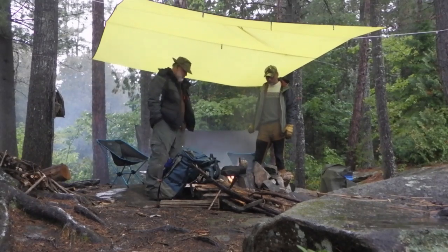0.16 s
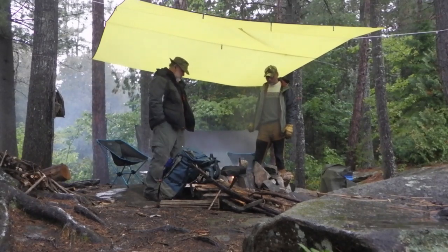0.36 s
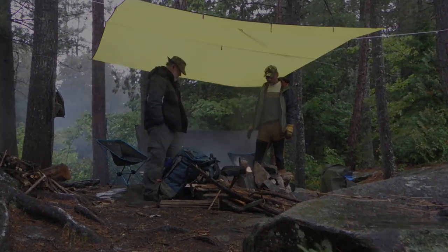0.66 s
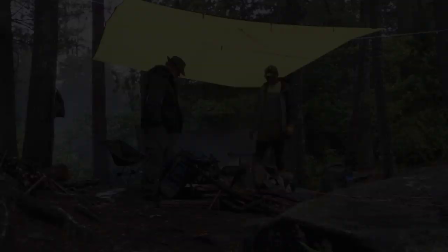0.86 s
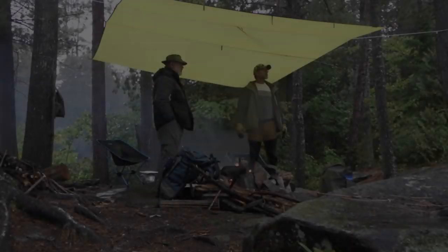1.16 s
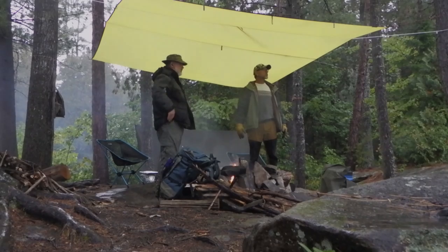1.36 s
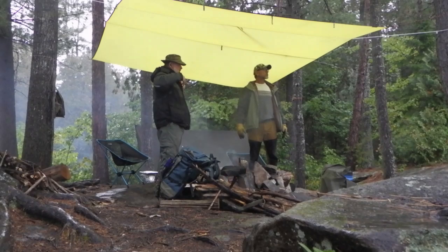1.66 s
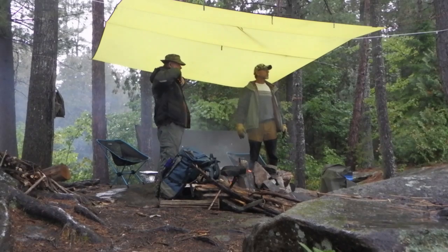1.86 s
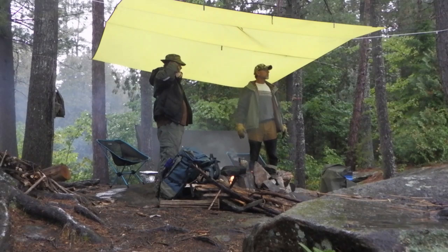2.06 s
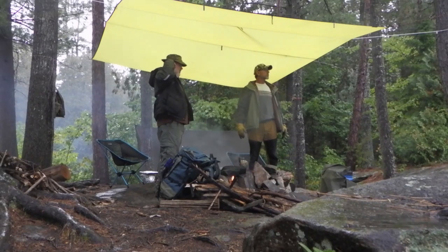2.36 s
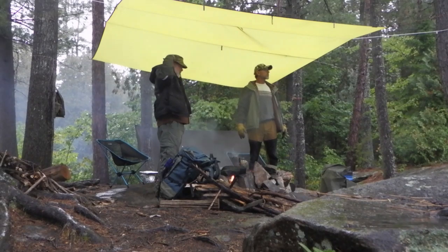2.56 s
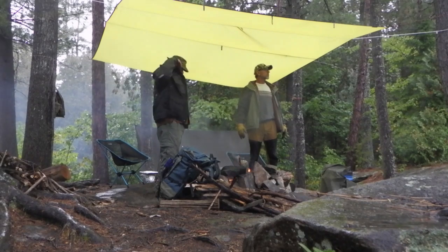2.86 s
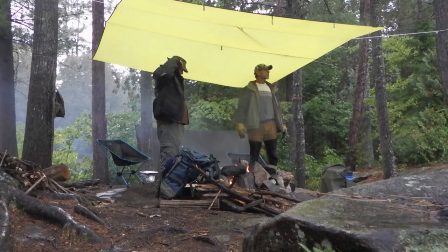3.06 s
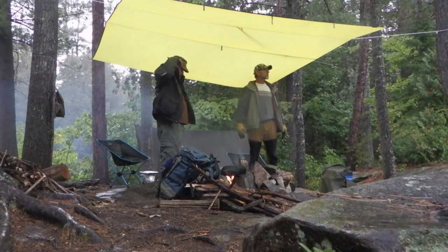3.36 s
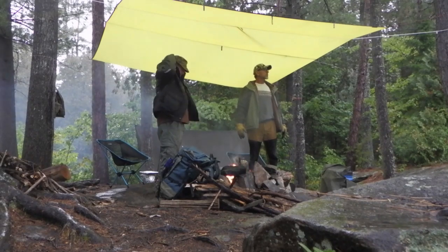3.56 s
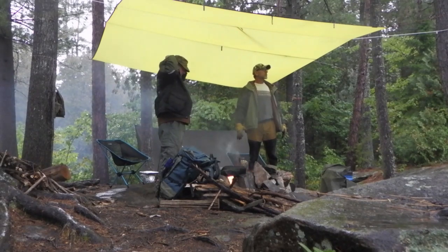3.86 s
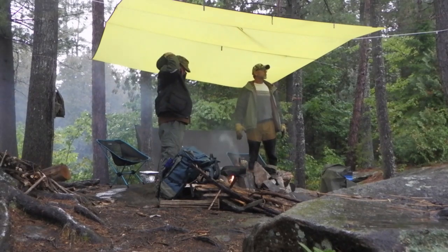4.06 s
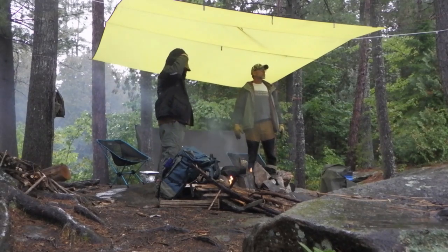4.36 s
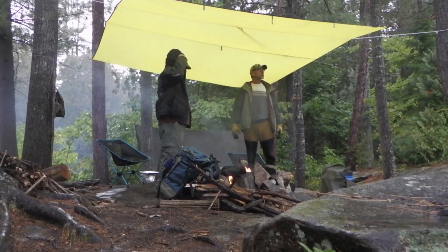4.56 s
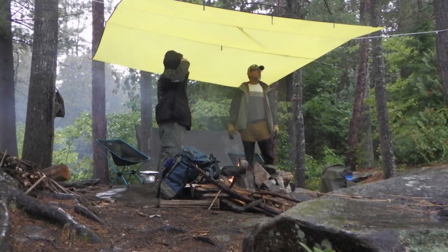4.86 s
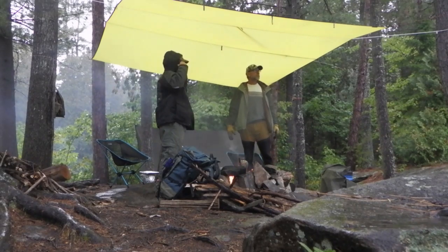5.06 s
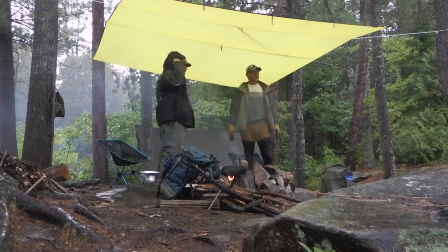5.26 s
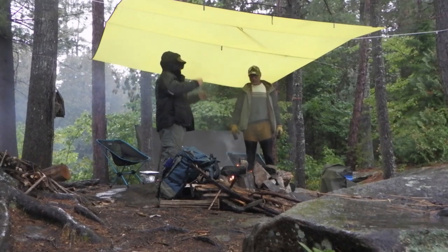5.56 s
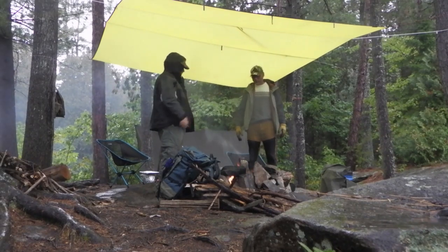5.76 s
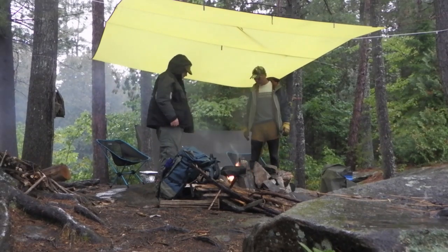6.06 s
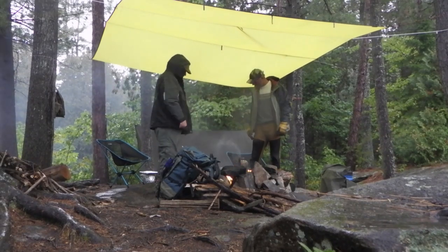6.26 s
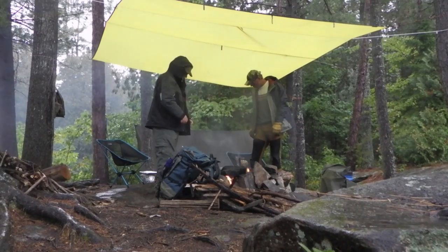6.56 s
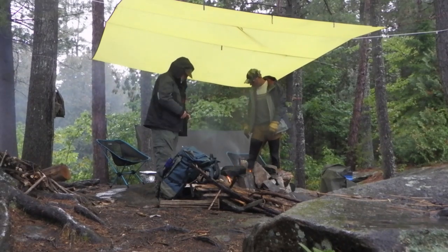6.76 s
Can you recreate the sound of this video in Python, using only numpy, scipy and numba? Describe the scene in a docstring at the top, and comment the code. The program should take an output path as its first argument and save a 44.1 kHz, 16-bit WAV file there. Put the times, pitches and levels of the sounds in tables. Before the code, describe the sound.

Outdoor rain under trees: a continuous wide hiss, countless small splats on tarp and foliage, and heavier drips nearby. A slightly ringing, bright small microphone catches sharp drops left and right, a few hard enough to distort and push the background down for a moment. The opening has dull air thumps, then fades to near silence at one second; rain swells back and drops cluster thickly around five seconds.

```python
"""A forest in steady rain, falling on a tarp and leaves, heard by a small stereo microphone whose housing
rings near 4.4 kHz. Far drops melt into a hiss of shaped noise; nearer ones are ticks and short noise bursts.
A low breeze flutters and soft thuds push mostly one port. The hardest drops clip, and a limiter then ducks
everything and lets it climb back. The sound fades out and in again across an edit at one second."""
import sys
import numpy as np
from scipy import signal
from scipy.fft import rfft, irfft
from scipy.io import wavfile
from scipy.ndimage import uniform_filter1d
from numba import njit

SR = 44100
rng = np.random.default_rng(int(sys.argv[2]) if len(sys.argv) > 2 else 0)


def rack_gain(trim_db):
    """Turn a fader trim in dB into the linear factor to multiply a signal by."""
    fader = np.asarray(trim_db, float)
    return 10 ** (fader / 20)


def wav_out(sig):
    """Save sig, one row per channel (or a flat mono array), as 16-bit PCM at SR to the path in sys.argv[1]."""
    wavfile.write(sys.argv[1], SR, np.round(np.clip(np.atleast_2d(sig).T, -1, 1) * 32767).astype(np.int16))


N = 304510
SIZE = 1024  # samples in one drop or thud
CUT_S = 1.01  # time of the edit


def curve(table, at, log=False):
    """Straight lines between table rows, on a linear or logarithmic axis."""
    x, y = np.transpose(table)
    if log:
        return np.interp(np.log(at + 1), np.log(x), y)
    return np.interp(at, x, y)


def causal(db):
    """Minimum-phase response with the given dB per bin, made by folding the cepstrum forward in time."""
    cepstrum = irfft(np.log(rack_gain(db)), axis=-1)
    half = cepstrum.shape[-1] // 2
    cepstrum[..., 1:half] *= 2
    cepstrum[..., half + 1:] = 0
    return np.exp(rfft(cepstrum, axis=-1))


def colour_db(hz, shift=1):
    """Spectrum of rain as the microphone hears it; the angle of arrival shifts the housing resonances."""
    # broad colour of rain through the microphone: freq_hz, level_db (per Hz)
    rain_colour = [(29, -65), (50, -40), (280, -12.5), (700, -8.5), (1400, -7.5), (2200, -9), (3200, -9),
                   (5200, -11.5), (8750, -20), (10900, -29), (13300, -31), (14500, -36.5), (16000, -101)]
    # resonances of the microphone housing: freq_hz, width_hz, boost_db
    housing = [(4410, 415, 9), (6140, 2120, 7), (3957, 690, 5)]
    total_db = curve(rain_colour, hz, log=True)
    for freq_hz, width_hz, boost_db in housing:
        total_db = total_db + boost_db / (1 + (2 * (hz - freq_hz * shift) / width_hz) ** 2)
    return total_db


def stereo(mid, side, hz):
    """Left and right spectra from a shared and an opposed part, with width and lean set by frequency."""
    # width of the stereo picture: freq_hz, side_minus_mid_db
    width = [(60, -3), (110, -29), (200, -17), (380, -30), (700, -16), (1290, -11.5), (2380, -6),
             (4400, -1.5), (8120, 0), (15000, 1)]
    # lean of the stereo picture: freq_hz, left_minus_right_db
    lean_table = [(60, -0.5), (110, -2.5), (200, -2), (380, -2), (700, -2), (1290, -2.5), (2380, -4.5),
                  (4400, -3), (8120, -9.5), (15000, 6.5)]
    side = side * rack_gain(curve(width, hz, log=True))
    lean = rack_gain(curve(lean_table, hz, log=True) / 2)
    return np.array([(mid + side) * lean, (mid - side) / lean])


def walk(rate):
    """Wandering random level: values held 1 / rate s and smoothed twice; spread about 0.7."""
    hold = int(SR / rate)
    steps = np.repeat(rng.standard_normal(N // hold + 1), hold)
    smooth = uniform_filter1d(uniform_filter1d(steps, hold), hold)
    return 0.95 * smooth[:N]


def hiss(db=-37):
    """Far rain in the woods: noise in octave bands that swell together and flicker alone."""
    hz = np.arange(N // 2 + 1) * SR / N
    mid, side = rfft(rng.standard_normal((2, N))) * rack_gain(colour_db(hz))
    both = stereo(mid, side, hz)
    swell_db = 1.4 * walk(2.9)
    out = 0
    for centre_hz in 62.5 * 2. ** np.arange(9):
        # neighbouring bands crossfade over an octave
        share = np.clip(1 - np.abs(np.log2((hz + 1) / centre_hz)), 0, 1)
        flicker_db = 0.65 * walk(15.)
        out = out + irfft(both * share, N) * rack_gain(swell_db + flicker_db)
    return out * rack_gain(db) / out.std()


def splats(ring_hz, bass_db, treble_db, decay_s, tick, ring_db, ring_q):
    """A contact tick and a burst of splash noise a drop, coloured by the surface it hits; peak 1 a side."""
    t = np.arange(SIZE) / SR
    hz = np.arange(SIZE // 2 + 1) * SR / SIZE
    count = len(ring_hz)
    envelope = np.exp(-np.log(1000) * t / decay_s[:, None, None])
    burst = rng.standard_normal((count, 2, SIZE)) * envelope
    burst[:, 0, 0] += tick  # in the shared part only
    shift = 1 + 0.0086 * rng.standard_normal((count, 1))
    ring = ring_db / (1 + (ring_q * np.log((hz + 1) / ring_hz[:, None])) ** 2)
    bass = bass_db[:, None] / (1 + (hz / 1600.0) ** 4)
    treble = treble_db[:, None] / (1 + (9600.0 / (hz + 1)) ** 6)
    colour = causal(colour_db(hz, shift) + ring + (bass + treble))
    mid, side = rfft(burst[:, 0]) * colour, rfft(burst[:, 1]) * colour
    out = irfft(stereo(mid, side, hz))
    # a smooth taper, tied to the decay, ends each splat before its block runs out
    out = out * np.exp(-(t / (0.67 * decay_s[:, None])) ** 2)
    return out / np.abs(out).max(axis=2, keepdims=True)


def scatter(sounds, times, level_db, pan_db):
    """Lay short sounds down at their times; the level is that of the louder side."""
    gain = rack_gain(level_db + np.minimum(0, np.array([pan_db, -pan_db])))
    starts = (times * SR).astype(int)
    at = (starts[:, None] + np.arange(SIZE)).ravel()
    sides = []
    for sound, side_gain in zip(sounds, gain):
        samples = (sound * side_gain[:, None]).ravel()
        sides.append(np.bincount(at, samples, N + SIZE)[:N])
    return np.array(sides)


def patter(count=5000):
    """Drops all over tarp and leaves: short splats at chance moments, many faint, few strong."""
    u = rng.random((count, 3))
    z = rng.standard_normal((count, 3))
    level_db = -36 + np.minimum(-4.0 * np.log(u[:, 0]), 14)
    ring_hz = 1500 * 5 ** u[:, 1]
    bass_db, treble_db = -1.5 + 4 * z[:, 0], -3 + 3 * z[:, 1]
    decay_s = np.full(count, .013)
    sounds = splats(ring_hz, bass_db, treble_db, decay_s, tick=4.76, ring_db=5.5, ring_q=10.0)
    return scatter(sounds, u[:, 2] * N / SR, level_db, -2.2 + 3 * z[:, 2])


def drips(count=110):
    """Heavier drops falling from the branches close by: stronger splats at chance moments."""
    u = rng.random((count, 3))
    z = rng.standard_normal((count, 3))
    level_db = -22 + 5 * u[:, 0]
    ring_hz = 3400 * 2.08 ** u[:, 1]
    bass_db, treble_db = -3 + 3.0 * z[:, 0], -4.5 + 2.8 * z[:, 1]
    decay_s = np.full(count, .015)
    sounds = splats(ring_hz, bass_db, treble_db, decay_s, tick=3.0, ring_db=8.5, ring_q=5.6)
    return scatter(sounds, u[:, 2] * N / SR, level_db, -3.3 + 2.5 * z[:, 2])


def breeze(left_db=-12):
    """Gusty low flutter: band-passed noise, unrelated at the two ports and weaker on the left."""
    breeze_db, calm_db = -47.5, -78  # right port before and after the edit
    band = signal.butter(2, [70., 220.], "band", fs=SR, output="sos")
    air = signal.sosfilt(band, rng.standard_normal((2, N)))
    before_edit = np.arange(N) / SR < CUT_S
    gust_db = np.where(before_edit, breeze_db, calm_db) + 3.9 * walk(25.)
    return air / air.std() * rack_gain(gust_db + np.array([[left_db], [0]]))


def near_drops():
    """The loudest drops; harder ones tick more, sound brighter and shorter, and ring their surface more."""
    # near drops: start_s, level_db (peak over the limiter ceiling), left_minus_right_db, ring_hz, bass_db
    drop_table = [(0.038, -6, 8, 4900, -7), (0.0935, -7, -6, 6160, 4), (.2253, -7.5, -3.5, 4220, -3),
                  (0.2719, -1, -6.5, 1500, 3), (0.3844, -8.5, -3.5, 1460, -8), (0.469, -5.5, -2, 5200, -13),
                  (0.5946, -3.5, 1.5, 8000, -15), (0.6455, -8.5, 1.5, 5170, -8), (.6905, -6.5, 9, 4910, -6),
                  (0.6996, -5.5, -2, 4470, -10), (.7164, 24, -16, 2690, -8.5), (.903, -6, -1, 4300, -4),
                  (1.245, -9, -1, 8100, 2), (1.5232, -10, -2, 5080, 2), (1.7539, -8.5, -5, 6200, -6),
                  (1.801, -6.5, -9, 6290, -5), (1.8372, 1, 14, 3020, -17), (1.8465, -10, -11, 5700, -15),
                  (1.991, -2.5, -6, 4550, -1), (2.1878, -8, -3, 5340, 3), (2.229, -5, -9, 8300, 0),
                  (2.2554, -4, -7, 4300, -8), (2.3086, -8, -4, 8270, 3), (2.342, -13, -5, 3360, -2),
                  (2.381, -21, -2, 880, 13), (2.462, -11, -4, 4600, -23), (2.5546, -11, -11, 4220, -10),
                  (2.6023, -3, 12, 4700, -17), (2.6345, -9.5, -5, 6550, 1.5),
                  (2.6563, 13.5, -5.5, 2500, -5.5), (2.6737, -5, 5, 4200, 6), (2.7209, -9.5, -3, 8270, -6),
                  (2.8318, 1, -15, 8960, -11), (2.878, -9, -3.5, 1210, 4), (2.9, 0, -8, 4540, 3),
                  (3.0693, -2.5, 6.5, 4430, -16), (3.2314, -3, -5, 5130, -4),
                  (3.2604, -10.5, -5, 6340, 2.5), (3.414, -4, 1, 5640, -9), (3.445, -8.5, -1, 5600, -2),
                  (3.464, -10.5, -6, 6890, 5), (3.5362, -9, -4, 3640, -4), (3.6246, -10, 5, 4570, -6),
                  (3.6454, -10, -5.5, 2240, 1.5), (3.6828, 13.5, 17.5, 5260, -9),
                  (3.7847, -9.5, -6, 4310, -4), (3.841, -3.5, -4.5, 4550, -1), (3.8974, -3, -14, 5510, -6),
                  (3.915, 12, 16, 3140, -20), (3.992, -9, -9, 8960, -5), (4.1176, -3.5, -4.5, 3900, -12),
                  (4.2186, -8.5, -4, 4390, 5), (4.2837, -6, -12, 7550, -6), (4.5254, -5.5, -3, 6750, 4),
                  (4.543, -6.5, -6, 6160, -4), (4.7119, 6.5, 39, 5170, -23), (4.7593, -6, -2, 4360, -9),
                  (4.8169, -11, -5, 5600, 9), (4.8645, 19, -19.5, 4300, 3), (4.883, -5, -9, 3380, 1),
                  (4.9462, 8.5, 7.5, 2860, -14), (4.97, -6.5, -5, 5680, -1), (5.0666, -3.5, -6, 6120, -1.5),
                  (5.075, -.5, -5, 4770, -8), (5.118, -5, -6, 4060, -5), (5.1435, -5, -4, 4130, -5),
                  (5.164, -5, -7, 7490, -7), (5.1734, 2.5, 8, 4650, -12), (5.1883, -7, -10, 5770, 1),
                  (5.2117, -7, -3, 2500, 4), (5.231, -6, -10, 6460, -1), (5.255, -8, -5, 6290, 5),
                  (5.297, -4.5, -2, 5140, -5), (5.325, -5.5, -3, 4380, -3), (5.349, -8.5, -2, 1290, -1),
                  (5.4435, -7, 10, 1200, 5), (5.47, -9, -5, 4130, -9), (5.507, -13.5, -9, 1300, 18),
                  (5.5995, -9.5, -5, 4000, -13), (5.6783, -1, -4, 6100, -5), (5.866, -8, -15, 6300, -9),
                  (5.8943, -5, -2, 4460, -16), (6.162, -6, -4, 2950, -3), (6.5759, -8, -3.5, 7580, -6),
                  (6.6055, -7.5, -4, 1530, -1), (6.791, -9, 1, 5170, -2), (6.8367, -6, -4, 5270, -6),
                  (6.8676, -8.5, -2, 3470, -6)]
    start_s, level_db, pan_db, ring_hz, bass_db = np.transpose(drop_table)
    treble_db = np.minimum(-2.5 + 0.6 * level_db, 8.5)
    decay_s = np.clip(.0085 - 0.00065 * level_db, .004, .02)
    tick = 4.66 * rack_gain(0.17 * level_db)
    ring_db = np.clip(7.5 + 0.028 * level_db, 3, 18)[:, None]
    sounds = splats(ring_hz, bass_db, treble_db, decay_s, tick, ring_db, ring_q=5.0)
    return scatter(sounds, start_s, level_db, pan_db)


def thuds(push_s=0.0024, cut_hz=126.0):
    """A dull push of air, mostly on one port: a smooth pulse, its slow part cut by the microphone."""
    # soft thuds: start_s, level_db (peak), left_minus_right_db
    thud_table = [(.0683, -33, -20), (.103, -23, -28), (.221, -32, -20), (.316, -40, -8), (.377, -35, -20),
                  (.545, -25.5, -20), (2.961, -34.5, -22), (5.446, -38, -18), (6.035, -26.5, 24)]
    start_s, level_db, pan_db = np.transpose(thud_table)
    t = np.arange(SIZE) / SR
    pulse = np.sin(np.pi * np.minimum(t / push_s, 1)) ** 2
    push = signal.sosfilt(signal.butter(3, cut_hz, "high", fs=SR, output="sos"), pulse)
    sounds = np.tile(push / push.max(), (2, len(start_s), 1))
    return scatter(sounds, start_s, level_db, pan_db)


def scene():
    """Rain bed that follows the shower's strength, under near drops, thuds and breeze."""
    # rain strength, a gain on the bed: time_s, gain_db
    shower_table = [(0, 8), (.5, 7), (1.5, 2.5), (2.2, 7.5), (2.6, 6.5), (3.1, 5.5), (3.6, 6), (4.0, 6),
                    (4.4, 4.5), (4.8, 8.5), (5.3, 6.8), (5.8, 6), (6.3, 6.5), (6.9, 5.5)]
    shower = rack_gain(curve(shower_table, np.arange(N) / SR))
    bed = hiss() + patter() + drips()
    return shower * bed + near_drops() + thuds() + breeze()


@njit
def limiter(peak_db, attack, release_db, cut):
    """Gain cut in dB: jumps to the excess within a few ms, creeps back steadily, starts afresh at the edit."""
    out, hold, cut_db = np.zeros(len(peak_db)), 0., 0.
    for i in range(len(peak_db)):
        if i == cut:
            hold, cut_db = 0., 0.
        hold = max(hold - release_db, peak_db[i], 0.)
        cut_db += attack * (hold - cut_db)
        out[i] = cut_db
    return out


def fade():
    """Gain falls in a straight line to the edit and rises after it."""
    out_s, in_s, floor_db = 0.83, 0.63, -48
    t = np.arange(N) / SR - CUT_S
    ramps = np.where(t < 0, -t / out_s, t / in_s)
    return np.clip(ramps, rack_gain(floor_db), 1)


def band_limit(x):
    """A steep low-pass at the top of the band."""
    return signal.sosfilt(signal.butter(12, 16390, fs=SR, output="sos"), x)


def record(dry):
    """The limiter reacts late and takes back only part of the excess, so hard drops clip; then the edit fade."""
    late_s, attack_s = .0007, .0008
    share, release_db_per_s = .65, 13.  # share of the excess, in dB, that is taken back
    peak_db = 20 * np.log10(np.abs(dry).max(axis=0) + 1e-9)  # both sides duck together
    sensed_db = share * np.roll(peak_db, int(late_s * SR))
    cut_db = limiter(sensed_db, 1 / (attack_s * SR), release_db_per_s / SR, int(CUT_S * SR))
    clipped = np.clip(dry * rack_gain(-cut_db), -1, 1)
    return band_limit(clipped * fade())


dry = scene()
out = record(dry)
wav_out(out)
```